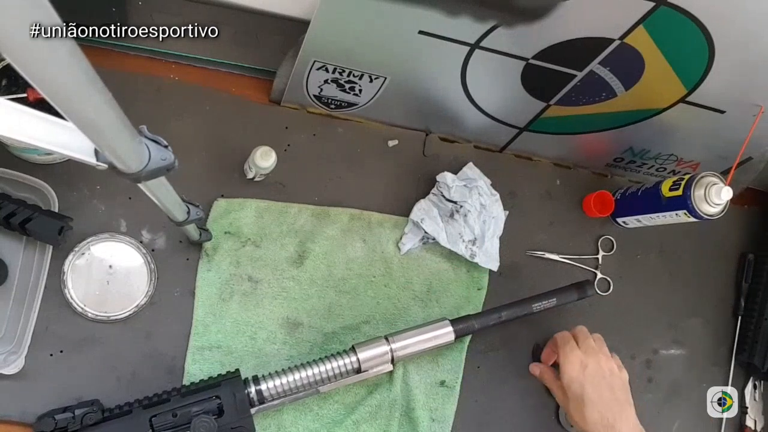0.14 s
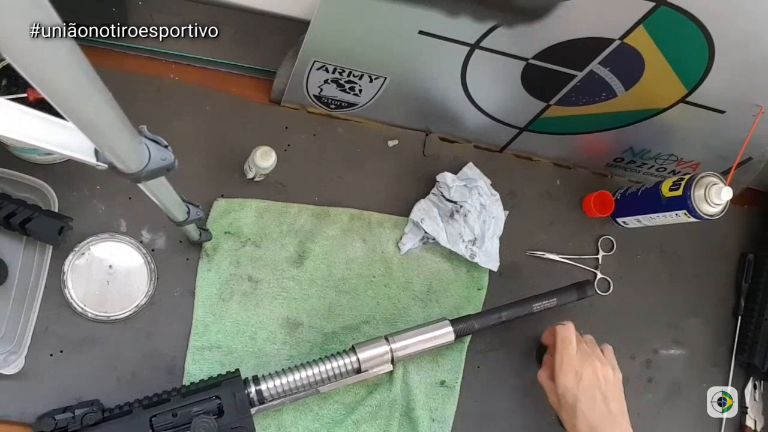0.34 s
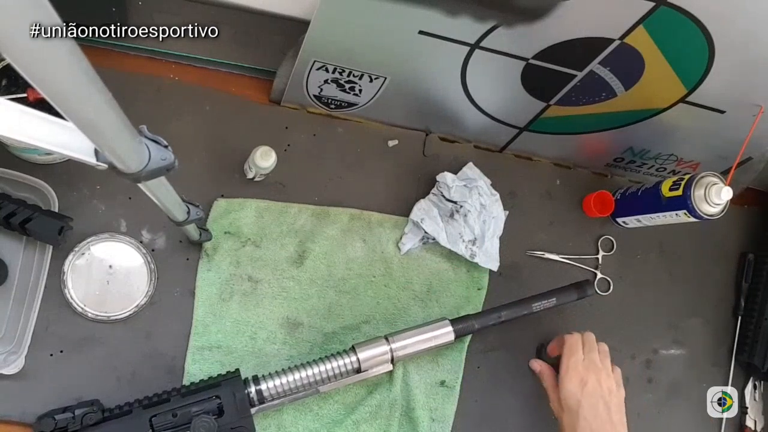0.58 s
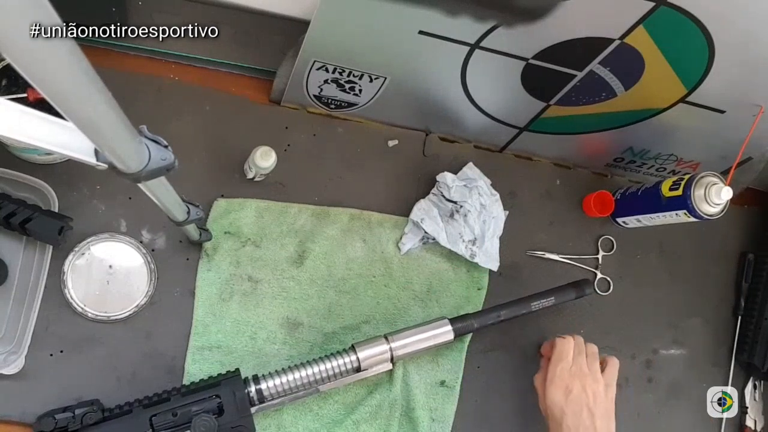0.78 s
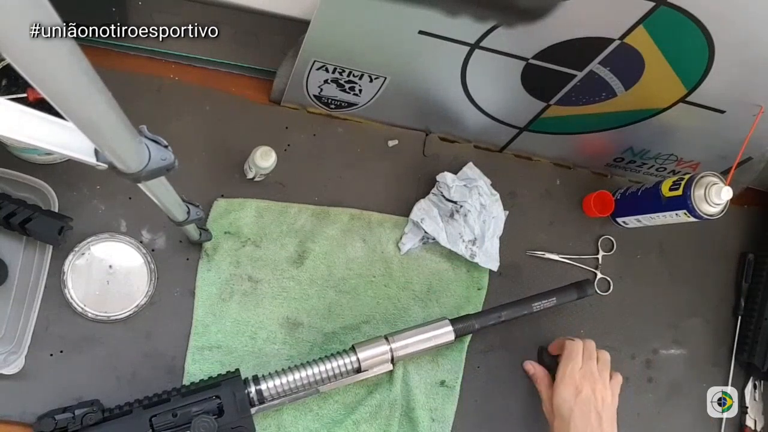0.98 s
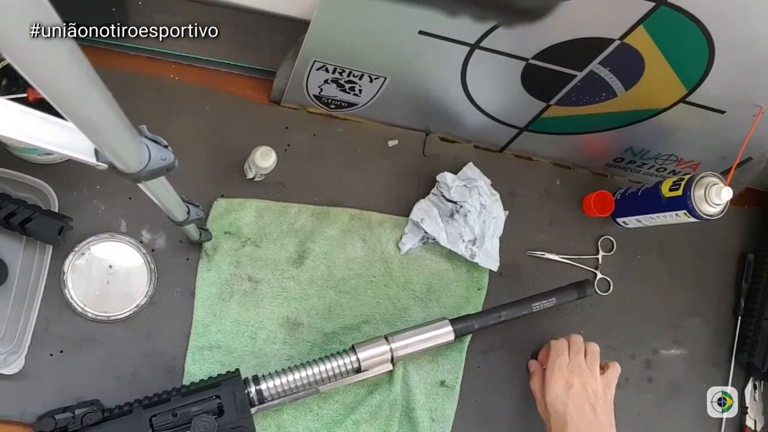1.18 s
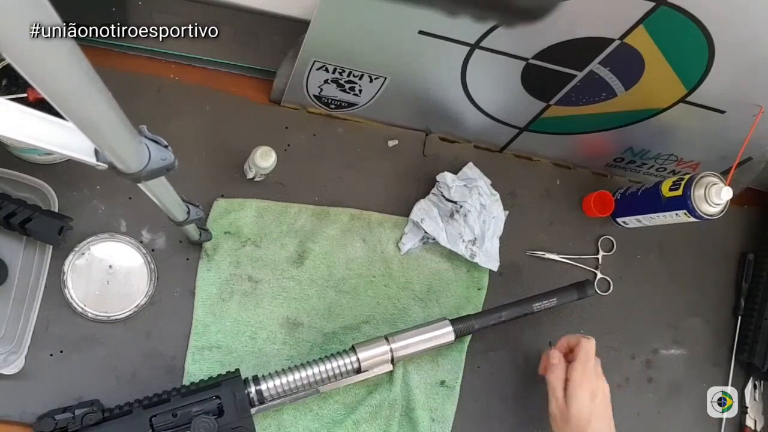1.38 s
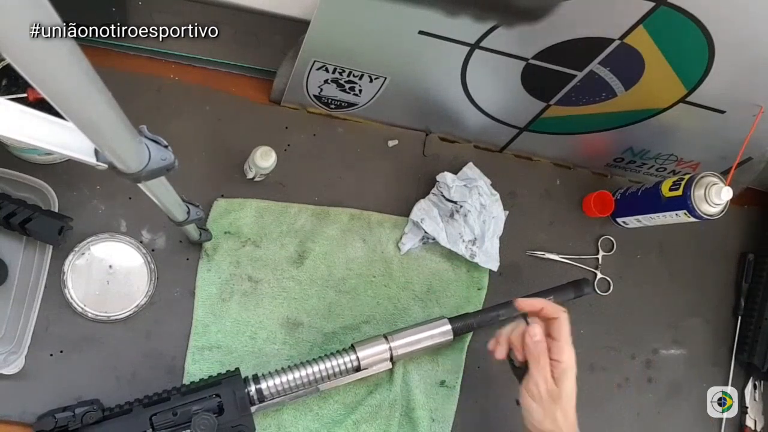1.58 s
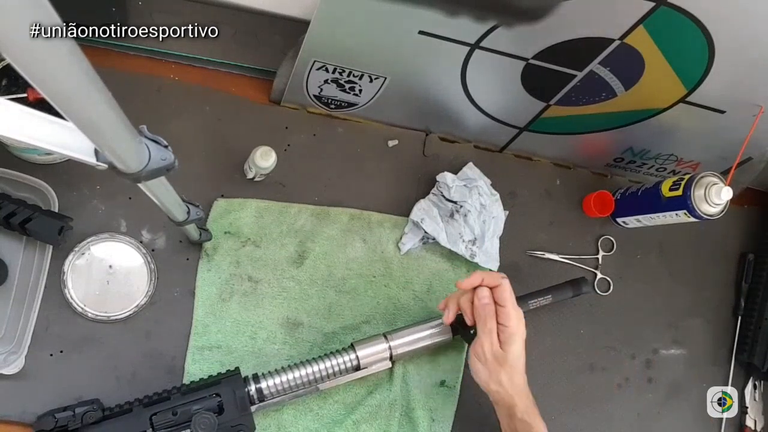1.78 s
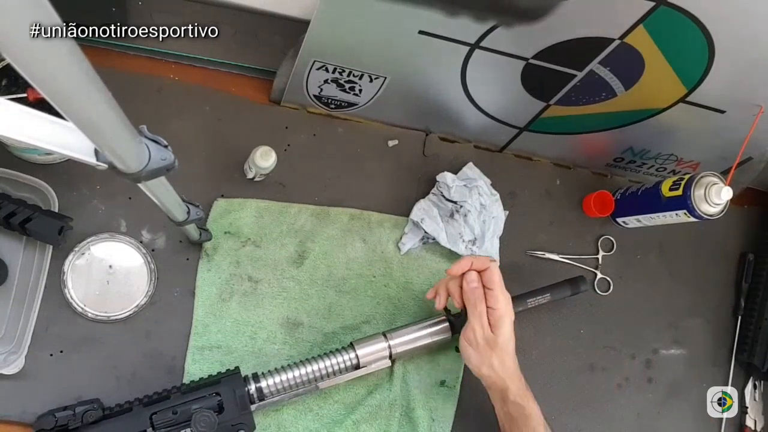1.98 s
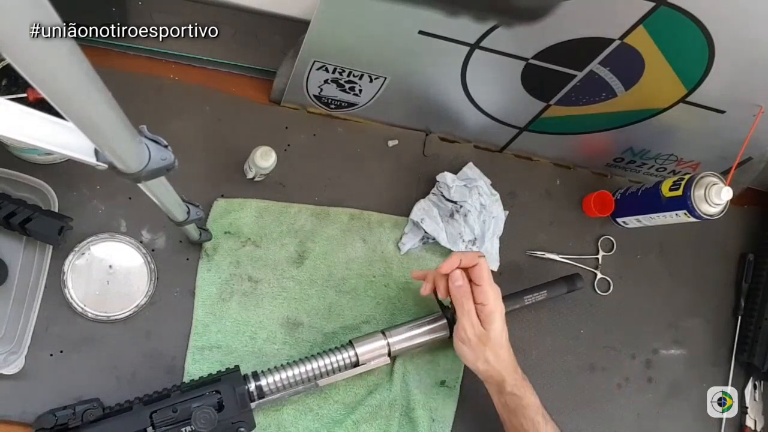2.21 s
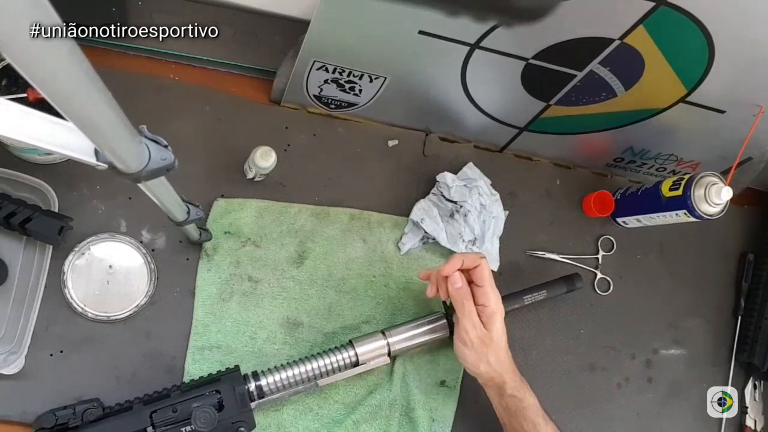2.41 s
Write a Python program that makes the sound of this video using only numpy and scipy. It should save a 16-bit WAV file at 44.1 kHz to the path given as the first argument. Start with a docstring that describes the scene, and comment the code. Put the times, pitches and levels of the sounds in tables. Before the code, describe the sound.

Soft bumps and rubbing on a workbench, then metal gun parts clack and click together.

```python
"""Soft rubbing and booming bumps, then steel clacks and brighter clicks, over a faint workshop hum.
A hand turns a small steel gun part on a workbench: the part drags over the top, and each bump makes
the wide bench ring with low notes. Then the part is slid onto a shotgun's magazine tube, knocks
against it and clicks into its seat, so both pieces ring. A phone listens from close above the bench."""
import sys
import numpy as np
from scipy import signal
from scipy.fft import rfft, irfft, next_fast_len
from scipy.io import wavfile

SR = 44100
rng = np.random.default_rng(int(sys.argv[2]) if len(sys.argv) > 2 else 0)


def store_wav(level_fs):
    """Save 16-bit WAV to argv[1]."""
    pcm = np.round(np.clip(np.atleast_2d(level_fs), -1, 1) * 32767)
    wavfile.write(sys.argv[1], SR, pcm.T.astype(np.int16))


N = 108045
T = np.arange(N) / SR
RING_T = T[:SR * 3 // 4]  # time since a blow, in seconds
LOW_LEFT_DB = 2.5  # the low sounds are this much louder on the left


def undb(db):
    """Turn decibels into a factor to multiply by."""
    return 10 ** (np.asarray(db) / 20)


def fade(t60):
    """A ring dying away: it drops 60 dB in t60 seconds, its fade time."""
    return np.exp(-np.log(1000) * RING_T / t60)


def pan(left_db):
    """Left and right factors that make the left side louder by left_db."""
    return undb(np.array([[left_db], [-left_db]]) / 2)


def noise(size, likeness=0.):
    """Stereo white noise; likeness runs from 0 (unrelated sides) to 1 (both the same)."""
    mid, side = rng.standard_normal((2, size))
    return np.sqrt((1 + likeness) / 2) * mid + np.sqrt((1 - likeness) / 2) * np.array([side, -side])


def colour(x, points):
    """Shape the tone along (f/Hz, level/dB) points; white noise keeps its power."""
    size = 2 * next_fast_len(x.shape[-1])
    hz, db = np.array(points, float).T
    gain = undb(np.interp(np.log(np.fft.rfftfreq(size, 1 / SR) + 1), np.log(hz), db))
    cepstrum = irfft(np.log(gain / np.sqrt(np.mean(gain ** 2))))
    # folding onto the first half keeps the filter from sounding before its input
    cepstrum[1:size // 2] *= 2
    cepstrum[size // 2 + 1:] = 0
    return irfft(rfft(x, size) * np.exp(rfft(cepstrum)))[..., :x.shape[-1]]


def walk(hz):
    """A random wander of about 1 either way, taking hz steps a second."""
    return np.interp(T * hz, np.arange(N), rng.standard_normal(N))


def add(out, start, x):
    """Mix x into out, beginning at start seconds."""
    i = int(start * SR)
    out[..., i:i + x.shape[-1]] += x[..., :N - i]


def room_tone(waver_hz=11, waver_db=2):
    """The room rumbles and hums unsteadily under the microphone's even hiss."""
    # notes of the hum: f/Hz, level/dB
    hum_notes = [(32.3, -65.5), (70, -57.5), (113, -59)]
    # the hum dips briefly before the clacks: t/s, level change/dB
    hum_level = [(0, 0.5), (1.3, 2), (1.62, 4), (1.68, -15), (2.0, -7.5), (2.2, 2), (2.45, 2.5)]
    # tone of the room's rumble: f/Hz, level/dB
    rumble_tone = [(20, -9.5), (32, 6.5), (45, -31.5), (70, 3), (90, 6), (115, 7), (150, -10), (250, -10.5),
                   (400, -22), (700, -38.5), (2000, -53)]
    # tone of the microphone's hiss: f/Hz, level/dB
    hiss_tone = [(200, 6.5), (700, 3.5), (1500, 2), (3000, 1.5), (4500, -1), (6000, 2), (8300, -5),
                 (10500, 1.5), (13000, 6), (15500, 2.5)]
    hum = np.zeros(N)
    for hz, db in hum_notes:
        level = np.sqrt(2) * undb(db + waver_db * walk(waver_hz))
        hum += level * np.sin(2 * np.pi * hz * T + 0.52 * walk(waver_hz))
    hum *= undb(np.interp(T, *np.array(hum_level).T))
    rumble = undb(-56) * colour(noise(N, likeness=0.84), rumble_tone)
    hiss = undb(-59.5) * colour(noise(N, likeness=0.05), hiss_tone)
    return pan(LOW_LEFT_DB) * (hum + rumble) + pan(left_db=1.5) * hiss


def workshop_echo(x, echo_db=-2.5, delay_s=0.0083):
    """The walls of the small room add a short, smooth echo to x."""
    air = noise(len(RING_T))
    low = signal.sosfilt(signal.butter(2, 4000, fs=SR, output="sos"), air)
    tail = (low * fade(t60=0.27) + (air - low) * fade(t60=0.29)) * (RING_T > delay_s)
    tail /= np.sqrt(np.sum(tail ** 2, axis=1, keepdims=True))
    return x + undb(echo_db) * signal.fftconvolve(x, tail, axes=1)[:, :N]


def resonance(x, hz, q):
    """Make noise ring near one pitch at about the same power; a higher q gives a clearer note."""
    b, a = signal.iirpeak(hz, q, fs=SR)
    return signal.lfilter(b, a, signal.lfilter(b, a, x)) * np.sqrt(2 * SR * q / (np.pi * hz))


def rubbing(grip_hz=540, grip_db=1):
    """The part catches and slips on the top: a grainy hiss, a scrape and a low drag through the bench."""
    # strokes: peak t/s, rise/s, fall/s, hiss/dB, scrape/dB, scrape f/Hz, scrape sharpness q, drag/dB
    strokes = [(.005, 0.013, 0.031, -62.5, -57, 1690, 5.4, -52),
               (0.069, 0.02, 0.12, -56.5, -70.5, 1770, 5.8, -55.5),
               (0.177, 0.028, 0.036, -51.5, -54, 2250, 4, -78),
               (.228, 0.038, 0.034, -51.5, -59.5, 1810, 3.2, -54),
               (0.339, 0.0029, 0.075, -59.5, -67.5, 2080, 1.6, -51),
               (0.389, 0.0035, 0.062, -54.5, -62, 1890, 2, -52),
               (.59, 0.032, 0.13, -59.5, -84, 1970, 3, -67), (0.635, 0.0059, 0.024, -55, -61, 2110, 5, -61),
               (0.692, .02, 0.054, -47.5, -52, 2100, 2.2, -50),
               (0.817, 0.009, 0.021, -56.5, -66, 2090, 2.7, -50.5),
               (0.845, 0.0065, 0.068, -57, -59, 1770, 2.5, -43),
               (1.001, 0.013, 0.17, -57, -63.5, 1970, 6.2, -63),
               (1.102, 0.022, 0.041, -53.5, -53.5, 2050, 5.7, -55),
               (1.161, 0.049, 0.041, -51.5, -60.5, 2100, 2.5, -53),
               (1.28, 0.022, .05, -84, -71.5, 3400, 7.9, -58),
               (1.39, 0.031, 0.077, -62.5, -62, 3390, 8.7, -60.5),
               (1.45, 0.017, 0.046, -61, -65, 2000, 2.9, -57.5),
               (1.55, 0.011, 0.016, -64, -94, 3040, 3, -58.5)]
    # tone of the rubbing hiss: f/Hz, level/dB
    rub_tone = [(300, -9), (800, -12.5), (1500, -2), (3200, 2), (4500, 1.5), (6500, 4.5), (8000, -1),
                (11000, -1), (15000, -4)]
    # tone of the low drag: f/Hz, level/dB
    drag_tone = [(40, -21), (90, 4), (170, 2), (300, -1.5), (450, -16), (700, -32), (3000, -42.5)]
    hiss_power, drag_power, scrape = np.zeros(N), np.zeros(N), np.zeros((2, N))
    grip = undb(grip_db * walk(grip_hz))
    for peak, rise, fall, hiss_db, scrape_db, scrape_hz, q, drag_db in strokes:
        swell = np.exp(-(np.minimum(T - peak, 0) / rise) ** 2 / 2)
        decay = np.exp(-np.maximum(T - peak, 0) / fall)
        stroke = grip * swell * decay + 1e-9
        hiss_power += (undb(hiss_db) * stroke) ** 2
        drag_power += (undb(drag_db) * stroke) ** 2
        scrape += undb(scrape_db) * resonance(noise(N, likeness=0.1) * stroke, scrape_hz, q)
    hiss = colour(noise(N, likeness=0.1) * np.sqrt(hiss_power), rub_tone)
    drag = colour(noise(N, likeness=0.79) * np.sqrt(drag_power), drag_tone)
    return pan(left_db=4) * (scrape + hiss) + pan(LOW_LEFT_DB) * drag


def soft_contact(x, cutoff_hz, q=1.081):
    """Springy fingers hold the part: the bump passes the lows and bounces a little at the cut-off."""
    w = 2 * np.pi * cutoff_hz
    b, a = signal.bilinear([w * w], [1, w / q, w * w], SR)
    return signal.lfilter(b, a, signal.lfilter(b, a, x))


def bench_bumps(firm_hz=346):
    """Bumps ring the bench's low notes; soft ones sound duller, firm ones rattle the part more."""
    # bumps: t/s, level/dB, cut-off f/Hz (lower is softer), extra sway of the lowest note/dB
    bumps = [(.001, -44, 310, -5), (.036, -39.5, 173, 9), (.062, -43.5, 196, -13), (0.182, -44, 180, -9),
             (.203, -40.5, 179, -11), (0.225, -35, 192, -26), (0.245, -40.5, 184, -5),
             (0.338, -40, 192, 12), (0.3857, -21, 183, -3), (0.3951, -23.5, 313, -12),
             (0.4108, -24.5, 150, 0), (0.443, -36, 391, -2), (.459, -35, 166, -5), (.631, -27, 143.4, 1),
             (0.657, -24.5, 115, -3), (.684, -35.5, 253, 13), (0.82, -32, 240, -18), (.842, -26.5, 304, 0),
             (.854, -27, 294, 1), (.872, -33.5, 443, -2.5), (.903, -37, 428, 0), (1.074, -35, 156.7, 4.5),
             (1.099, -28.5, 118, 4.5), (1.153, -42, 186, 0.5), (1.221, -46, 119, 4.5),
             (1.273, -42.5, 123, 3), (1.424, -47.5, 172, -10), (1.445, -46, 162, 2), (1.872, -40, 116, -6),
             (2.096, -44.5, 131, -30), (2.242, -42.5, 102, -1), (2.315, -42.5, 101, 0.5),
             (2.343, -46, 102, 5), (2.402, -49.5, 99, 10)]
    # notes the bench rings at: f/Hz, level/dB, fade time/s
    bench_notes = [(76.03, -8, 0.41), (117.7, -13.5, 0.31), (146.5, -5.5, 0.22), (160.8, -6.5, 0.12),
                   (192.7, -11.5, 0.1), (215, -13, .14), (245, -23.5, 0.043), (287.2, -8, 0.14),
                   (379, -20, 0.22), (416.5, -20.5, 0.24), (445.7, -13, 0.27), (585, -39, 0.25)]
    # tone of the top's dull thud: f/Hz, level/dB
    thud_tone = [(30, 1), (70, -8.5), (160, 10.5), (300, 0.5), (450, 0), (650, -17.5), (1000, -9),
                 (2000, -30.5), (12000, -5.5)]
    # tone of the part's faint rattle: f/Hz, level/dB
    rattle_tone = [(300, -2), (600, -0.5), (1000, -5.5), (2000, -12), (3000, -31), (12000, -21)]
    out = np.zeros((2, N))
    notes = [undb(db) * fade(t60) * np.sin(2 * np.pi * hz * RING_T) for hz, db, t60 in bench_notes]
    rattle_shape = fade(t60=0.13) * (1 - fade(t60=0.0091))
    for start, db, cutoff_hz, sway_db in bumps:
        ring = undb(sway_db) * notes[0] + sum(notes[1:])
        thud = undb(-3.5) * colour(noise(len(RING_T), likeness=0.79) * fade(t60=0.22), thud_tone)
        rattle = colour(noise(len(RING_T), likeness=0.46) * rattle_shape, rattle_tone)
        rattle *= undb(-23.5) * (cutoff_hz / firm_hz) ** 2
        add(out, start, undb(db) * (soft_contact(ring + thud, cutoff_hz) + rattle))
    # the top gives little deep bass to the air
    bass_cut = signal.butter(3, 62.3, "high", fs=SR, output="sos")
    return pan(LOW_LEFT_DB) * signal.sosfilt(bass_cut, out)


def steel_blow(notes, crack_tone, ring_db, crack_db, crack_t60, contact_s=0.00042):
    """Struck steel gives a short crack and notes whose strength and pitch vary with the spot hit."""
    ring = 0
    for hz, db, t60 in notes:
        strength, detune = rng.standard_normal(2)
        phase = rng.uniform(0, 2 * np.pi) + .9 * rng.standard_normal((2, 1))  # differs on each side
        note = np.sin(2 * np.pi * hz * (1 + .002 * detune) * RING_T + phase)
        held_fade = fade(min(t60, .14))  # the hand cuts long rings short
        ring += undb(db + 2 * strength) * held_fade * note
    crack = colour(noise(len(RING_T), likeness=0.05) * fade(crack_t60), crack_tone)
    onset = 1 - np.exp(-RING_T / contact_s)
    return (undb(ring_db) * ring + undb(crack_db) * crack) * onset


def steel_clacks():
    """The part knocks against the tube, then clicks into its seat; each blow rings both pieces."""
    # steel hitting steel: t/s, tube level/dB, part level/dB, extra crack of a hard edge/dB
    clacks = [(1.9262, -38.5, -56, 8.5), (1.9371, -28, -48, -5), (1.9535, -29, -57, -9.5),
              (1.978, -45.5, -49, 7.5), (2.1042, -27, -42, -1.5), (2.1477, -37, -66, -7.5),
              (2.1597, -50, -39.5, 4), (2.249, -57, -60, 12.5), (2.2562, -59, -38, 4.5),
              (2.2984, -42, -32, 1), (2.3051, -46.5, -38.5, 2.5), (2.321, -49, -44, -0.5),
              (2.342, -39, -51, -20)]
    # notes of the tube: f/Hz, level/dB, fade time before the hand shortens it/s
    tube_notes = [(557.6, -20.5, 0.31), (886, -16.5, 0.1), (1281.4, -3.5, 0.1), (1346, -3, 0.088),
                  (1445, -10, 0.04), (1618, -32, .14), (1736, -19.5, .14), (2210, -12.5, 0.076),
                  (2412, -10.5, 0.065), (2850, -23, 0.089), (3030, -19.5, 0.11), (3610, -22, .1),
                  (3990, -12, .07), (5790, -17, 0.1)]
    # notes of the small part: f/Hz, level/dB, fade time before the hand shortens it/s
    part_notes = [(1180, -29, 0.063), (1442, -7, 0.16), (1555, -7, 0.16), (1780, -7, 0.11),
                  (2956, -3, 0.11), (3760, -25, .12), (5170, -16, 0.15), (5980, -13.5, 0.073),
                  (8600, -12, 0.11), (8960, -12, 0.084), (9300, -26, 0.067), (10830, -7, 0.17),
                  (11600, -13, .1), (11600, -15, .08)]
    # the tube's crack, a crowd of quickly dying overtones: f/Hz, level/dB
    tube_crack = [(200, -10), (700, -6.5), (1000, -7), (1350, 11.5), (1900, 2.5), (2500, 7.5), (4000, 0),
                  (5000, -7), (6300, -8.5), (7600, -13), (15000, -23)]
    # the part's brighter crack: f/Hz, level/dB
    part_crack = [(200, -15), (600, -10), (1100, 5), (1500, 7.5), (2200, -6.5), (4000, 0.5), (5500, 1.5),
                  (6800, -4.5), (7700, -9.5), (8900, -2.5), (12000, -4), (15000, -9)]
    out = np.zeros((2, N))
    for start, tube_db, part_db, edge_db in clacks:
        tube = steel_blow(tube_notes, tube_crack, ring_db=-5.5, crack_db=edge_db - 1.5, crack_t60=0.046)
        part = steel_blow(part_notes, part_crack, ring_db=-10, crack_db=edge_db + 1, crack_t60=0.032)
        add(out, start, undb(tube_db) * tube + undb(part_db) * part)
    return pan(left_db=2.5) * out


def scene(right_lag_s=.00012):
    """Bumps, rubbing, echoing steel and room tone all reach the left microphone a little sooner."""
    left, right = bench_bumps() + rubbing() + workshop_echo(steel_clacks()) + room_tone()
    late_right = np.pad(right, (round(right_lag_s * SR), 0))[:N]
    return np.array([left, late_right])


def record(dry):
    """The phone cuts off the highest treble."""
    top_hz = 15450
    return signal.sosfilt(signal.ellip(10, .2, 80, top_hz, fs=SR, output="sos"), dry)


dry = scene()
out = record(dry)
store_wav(out)
```